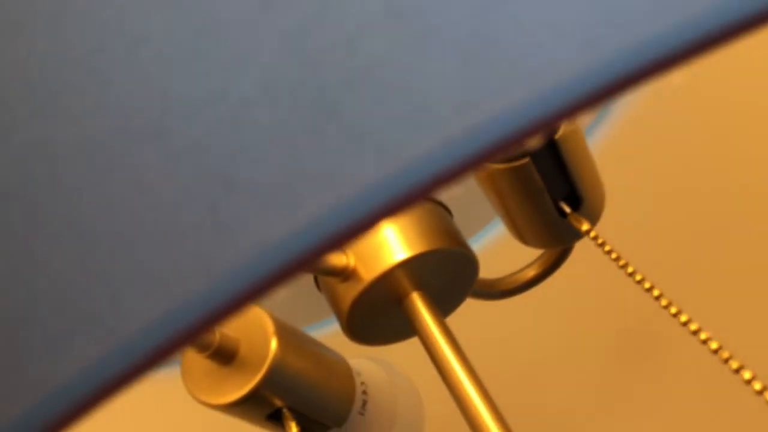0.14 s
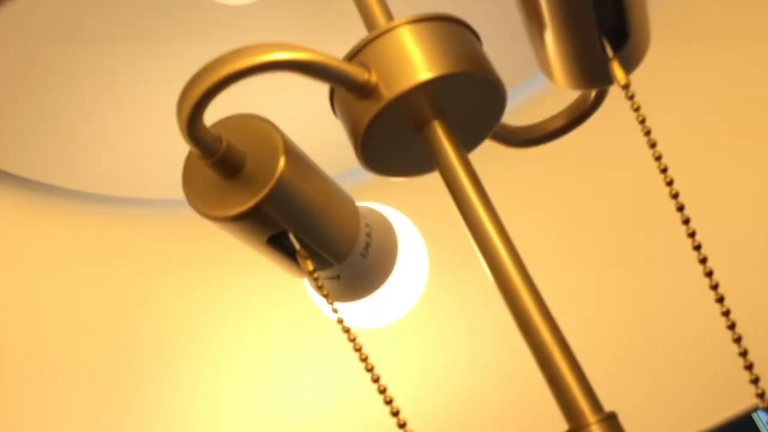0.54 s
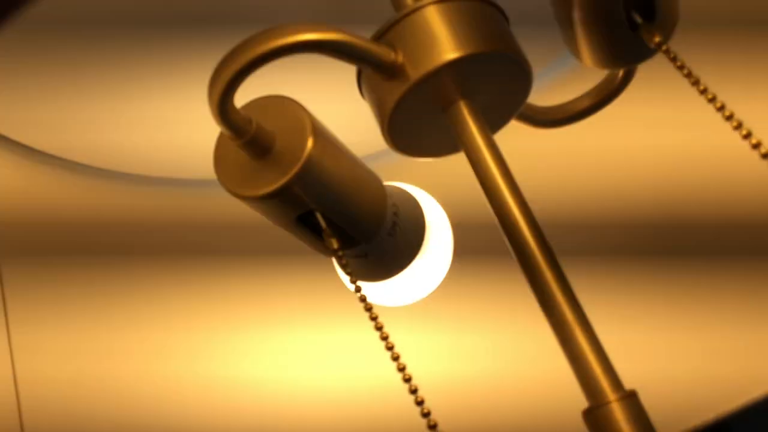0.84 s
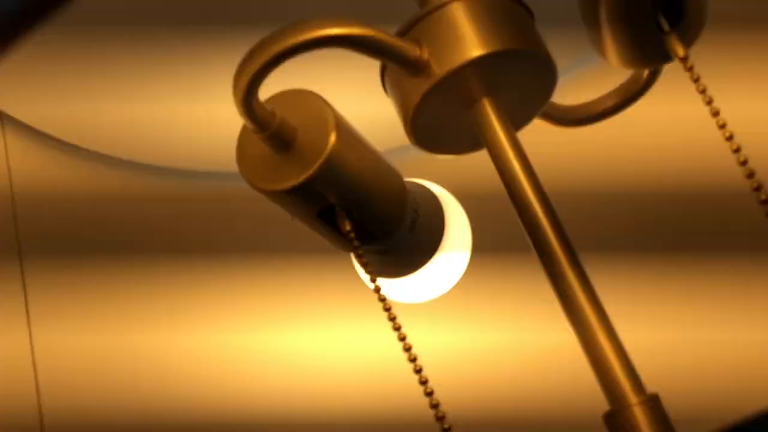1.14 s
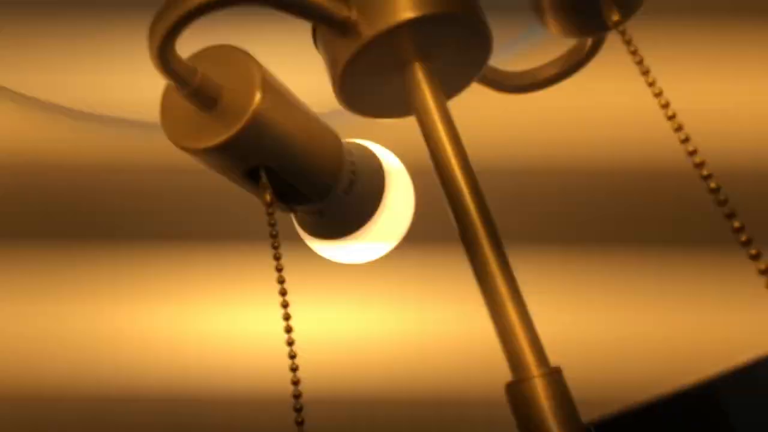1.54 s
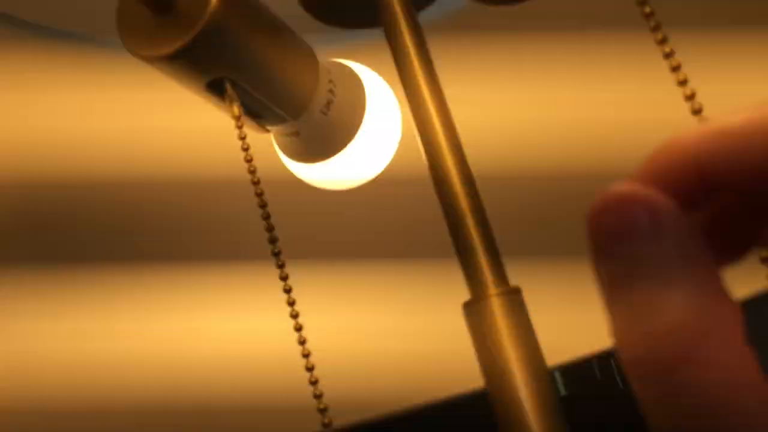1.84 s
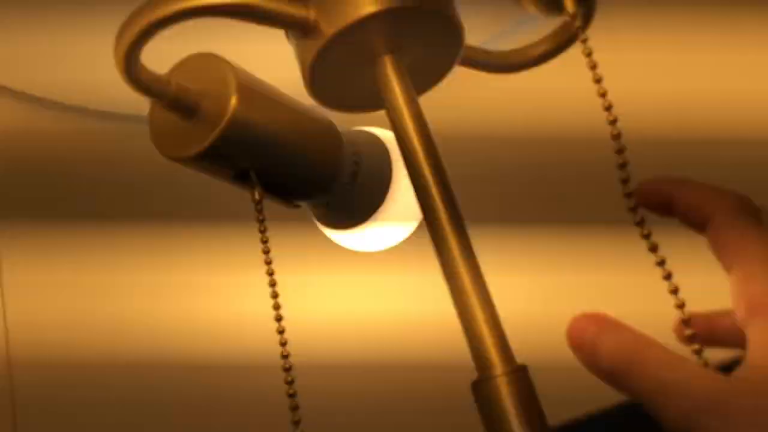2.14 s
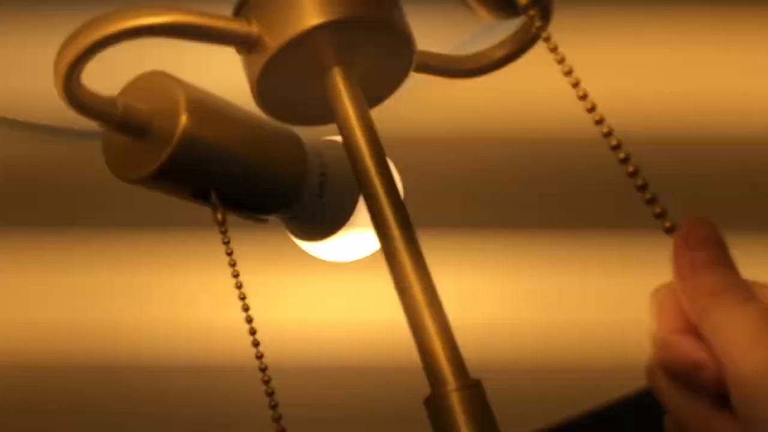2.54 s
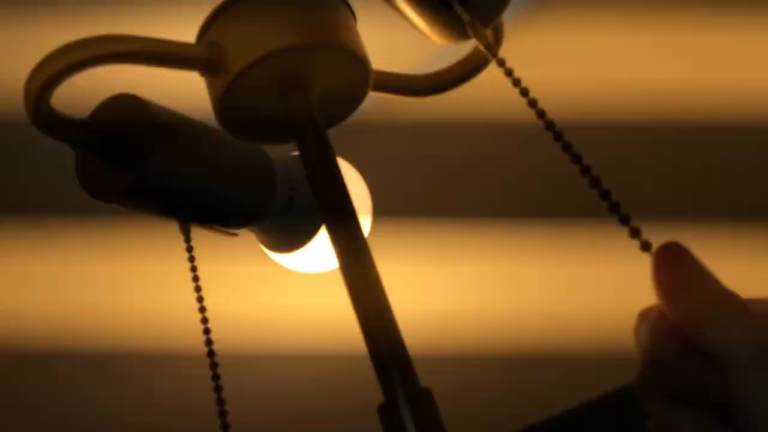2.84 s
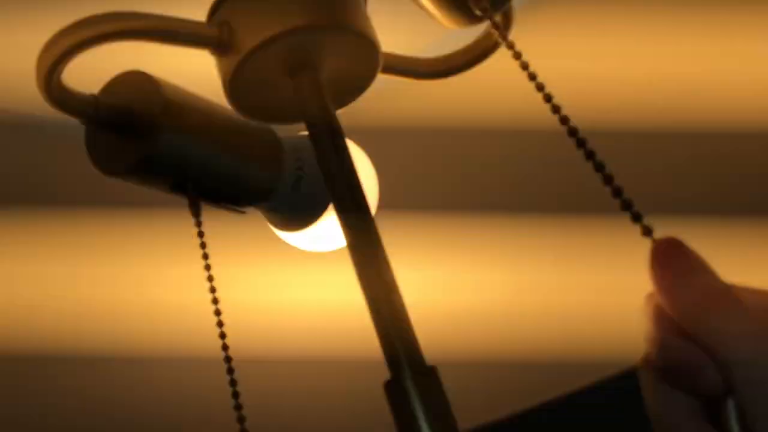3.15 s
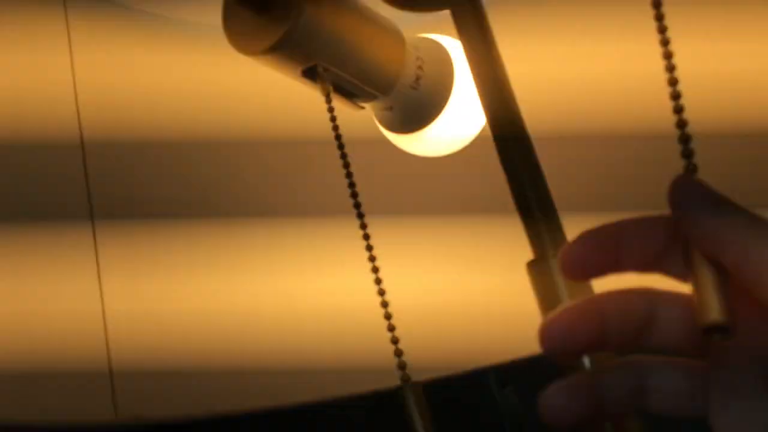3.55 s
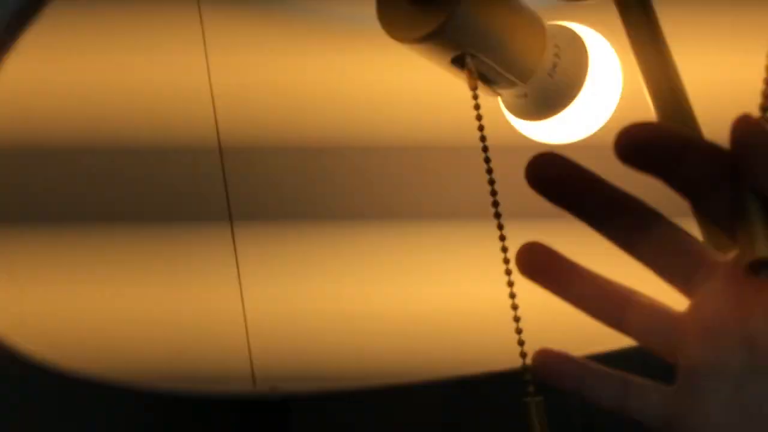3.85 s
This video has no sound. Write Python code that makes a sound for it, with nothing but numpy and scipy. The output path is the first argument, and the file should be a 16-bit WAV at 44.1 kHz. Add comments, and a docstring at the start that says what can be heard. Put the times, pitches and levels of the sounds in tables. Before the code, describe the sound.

Pull-chain lamp switches, heard close in a quiet room over steady low ventilation rumble and faint hiss. A very faint bead-chain scrape comes at 0.35-0.5 s, a dry switch snap at 1.1 s, then tiny chain ticks until 1.4 s. After a pause, faint scraping and ticks lead to a crisp click at 2.8 s and the loudest, brightest snap at 3.06 s, with brief thin brass ringing and short room reflections.

```python
"""Heard close by in a quiet room: a bead chain slides out of a brass lamp socket, a switch snaps back, the chain
ticks; then the other switch is pulled and let go, over a low ventilation rumble.
Each snap is a rattle of filtered-noise contacts plus decaying switch and shell modes; slides are sparse noise
grains, ticks are short noise with a bead tone, the room tone is coloured noise with hum.
Snaps and chain are convolved with the reflections of shade and room."""
import sys
import numpy as np
from scipy import signal
from scipy.fft import rfft, irfft
from scipy.io import wavfile
from scipy.ndimage import map_coordinates

SR = 44100
rng = np.random.default_rng(int(sys.argv[2]) if len(sys.argv) > 2 else 0)


def inscribe(sig):
    """Save sig as 16-bit PCM at rate SR to the path in sys.argv[1].

    A 1-D sig is mono; a 2-D sig holds one channel per row.
    Samples are clipped to [-1, 1] before scaling.
    """
    pcm = np.round(np.clip(np.atleast_2d(sig).T, -1, 1) * 32767)
    wavfile.write(sys.argv[1], SR, pcm.astype(np.int16))


N = 176400  # samples, 4 s

# contacts inside each snap: [t/s, level/dB, tilt/(dB per octave)]
LEFT_RELEASE_CONTACTS = [(1.1072, -29.5, 3.5), (1.1085, -24, 0.5), (1.1110, -37, -5.5), (1.1152, -40, -1),
                         (1.1163, -58, 9)]
RIGHT_PULL_CONTACTS = [(2.8031, -21.5, 6), (2.8040, -23, -1), (2.8062, -27.5, 0), (2.8102, -35, 0),
                       (2.8135, -36, -1)]
RIGHT_RELEASE_CONTACTS = [(3.0594, -13, 6), (3.0615, -17.5, -4), (3.0632, -24, -4), (3.0676, -33, -2)]


def amp(db):
    """Decibels to gain."""
    return 10 ** (np.asarray(db) / 20)


def unit(x):
    """Scale to rms 1."""
    return x / np.sqrt(np.mean(x ** 2) + 1e-20)


def along(points, hz):
    """Interpolate (f/Hz, value) points on a log frequency axis."""
    f, v = np.transpose(points)
    return np.interp(np.log(hz + 1), np.log(f + 1), v)


def coloured(x, colour):
    """Filter x by a (f/Hz, level/dB) colour, then scale to rms 1."""
    hz = np.fft.rfftfreq(len(x), 1 / SR)
    return unit(irfft(rfft(x) * amp(along(colour, hz)), len(x)))


def noise(colour, size):
    """Coloured Gaussian noise of rms 1."""
    return coloured(rng.standard_normal(size), colour)


def wobble(knots_per_s, size):
    """Smooth random curve: a spline through Gaussian knots."""
    knots = rng.standard_normal(int(size * knots_per_s / SR) + 4)
    return map_coordinates(knots, [np.arange(size) * knots_per_s / SR])


def decay(t60_s):
    """One second of exponential decay, down 60 dB after t60_s."""
    return np.exp(-np.log(1000) * np.arange(SR) / SR / t60_s)


def add(track, start_s, sound):
    """Mix a sound into the track in place, cut at the track's end."""
    part = track[round(start_s * SR):][:len(sound)]
    part += sound[:len(part)]


def ring(modes):
    """Sum of decaying (f/Hz, t60/s, level/dB) modes; low ones build up more slowly, phases wander."""
    build_cycles, phase_wander_rad = 3.6, 0.12
    t = np.arange(SR) / SR
    out = np.zeros(SR)
    for hz, t60_s, db in modes:
        phase = 2 * np.pi * (hz * t + rng.random()) + phase_wander_rad * wobble(300, SR)
        build_up = 1 - np.exp(-t * hz / build_cycles)
        out += amp(db) * decay(t60_s) * build_up * np.sin(phase)
    return out


def room_tone():
    """Ventilation rumble and faint hiss as coloured noise, plus hum wavering in level and phase."""
    # noise colours: [f/Hz, relative level/dB]
    rumble_colour = [(20, -44), (28, -34), (40, -12.5), (52, -3), (66, 0.5), (85, -1.5), (125, -8),
                     (160, -3.5), (215, -12), (255, -9), (380, -20), (500, -17), (850, -33.5),
                     (1050, -30.5), (1500, -48), (4000, -81)]
    hiss_colour = [(200, -2.5), (1500, 0.5), (3000, -1.5), (4700, -3), (5200, -1), (5700, -5), (7200, -4.5),
                   (7600, -0.5), (8000, -4), (9200, -4), (9600, 0), (10000, -6), (11400, -7.5),
                   (12000, -9.5), (15700, -12), (16000, -31.5)]
    # hum tones: [f/Hz, rms level/dB]
    hum_tones = [(66, -63), (192, -67), (250, -72)]
    rumble_db, hiss_db = -53.5, -74.5
    t = np.arange(N) / SR
    out = amp(rumble_db) * noise(rumble_colour, N) + amp(hiss_db) * noise(hiss_colour, N)
    for hz, db in hum_tones:
        swell = 1 + 0.3 * wobble(5, N)
        tone = np.sin(2 * np.pi * hz * t + 1.2 * wobble(6, N))
        out += amp(db) * unit(swell * tone)
    return out


def reflections(x):
    """Quick scatter from shade and table, then a room tail whose decay time depends on frequency."""
    # room decay: [f/Hz, t60/s]
    room_t60 = [(500, .4), (2000, 0.3), (5000, 0.51), (9000, 0.5), (14000, .2)]
    # room colour: [f/Hz, relative level/dB]
    room_colour = [(500, 8), (2000, 3), (5000, -4), (9000, -11), (14000, -7)]
    room_db, room_delay_s = -17, 0.008
    shade_db, shade_delay_s, shade_t60_s = -12, 0.004, 0.07
    hz, t, spectrum = signal.stft(noise(room_colour, SR), SR, nperseg=256)
    fade = np.exp(-np.log(1000) * t / along(room_t60, hz)[:, None])
    tail = signal.istft(spectrum * fade, SR, nperseg=256)[1]
    scatter = rng.standard_normal(SR) * decay(shade_t60_s)
    response = np.zeros(SR)
    add(response, room_delay_s, amp(room_db) * tail / np.linalg.norm(tail))
    add(response, shade_delay_s, amp(shade_db) * scatter / np.linalg.norm(scatter))
    return signal.fftconvolve(x, response)[:N]


def chain_slides():
    """Beads scrape over the slot edge: sparse random grains under short Gaussian swells."""
    # swells: [centre t/s, Gaussian sigma/s, peak level/dB]
    swells = [(0.3578, 0.0034, -57), (0.376, 0.038, -74.5), (0.412, 0.0026, -73), (0.422, 0.0072, -69.5),
              (0.484, 0.016, -71.5), (2.622, 0.022, -77), (2.786, 0.024, -63)]
    # scrape colour: [f/Hz, relative level/dB]
    slide_colour = [(800, -15), (2000, -5), (3500, 0.5), (4200, -8), (4950, 4.5), (5900, -9), (6800, -5),
                    (10500, -13), (13000, -23)]
    grains_per_s = 1200
    t = np.arange(N) / SR
    grains = rng.standard_normal(N) * (rng.random(N) < grains_per_s / SR)
    envelope = sum(amp(db) * np.exp(-0.5 * ((t - s) / sigma_s) ** 2) for s, sigma_s, db in swells)
    return coloured(grains, slide_colour) * envelope


def chain_ticks():
    """Single beads tap: a noise burst with one small decaying tone."""
    # ticks: [t/s, level/dB, ring f/Hz, ring level re tick/dB]
    ticks = [(1.2428, -58, 12500, -17), (1.3128, -58, 10800, 4), (1.4150, -56, 5470, -9),
             (2.7684, -64, 13400, -2), (2.7738, -52.5, 4000, -2)]
    # tap colour: [f/Hz, relative level/dB]
    tick_colour = [(1000, -25), (4000, -9.5), (7000, -3), (13000, 0), (16000, -4)]
    tick_t60_s, bead_t60_s = 0.019, 0.036
    out = np.zeros(N)
    for s, db, hz, ring_db in ticks:
        tap = decay(tick_t60_s) * noise(tick_colour, SR)
        bead = ring([(hz, bead_t60_s, ring_db)])
        add(out, s, amp(db) * (tap + bead))
    return out


def shells():
    """Brass shells ring on after each snap with a few thin tones."""
    # left shell modes: [f/Hz, t60/s, level before shell_db/dB]
    left_shell = [(1670, 1.0, -71), (3386, .4, -68), (5592, .8, -65), (6563, .25, -54), (7515, .4, -63)]
    # right shell modes: [f/Hz, t60/s, pull level before shell_db/dB, release level before shell_db/dB]
    right_shell = [(1513, .9, -71, -57), (1680, .25, -61, -60), (3526, .12, -47, -39),
                   (4985, .65, -62, -58), (6293, .32, -47, -37), (7538, .27, -66, -52),
                   (8146, .38, -60, -55)]
    shell_db = -1.5
    pulled = [(hz, t60_s, db) for hz, t60_s, db, _ in right_shell]
    released = [(hz, t60_s, db) for hz, t60_s, _, db in right_shell]
    out = np.zeros(N)
    add(out, LEFT_RELEASE_CONTACTS[0][0], ring(left_shell))
    add(out, RIGHT_PULL_CONTACTS[0][0], ring(pulled))
    add(out, RIGHT_RELEASE_CONTACTS[0][0], ring(released))
    return amp(shell_db) * out


def switch_modes(levels):
    """Give each (f/Hz, level/dB) switch mode its t60; higher modes die sooner."""
    ref_t60_s, ref_hz, damping_exponent = 0.037, 5020, 0.55
    return [(hz, ref_t60_s * (ref_hz / hz) ** damping_exponent, db) for hz, db in levels]


def snap(contacts, colour, modes):
    """The sprung rotor hits its stop, rattles for a few milliseconds and rings the socket."""
    contact_t60_s, contact_rise_s = 0.013, 0.00043
    tilt_from_hz = 1800  # contacts differ in colour only above this
    rise = 1 - np.exp(-np.arange(SR) / SR / contact_rise_s)
    envelope = decay(contact_t60_s) * rise
    out = np.zeros(N)
    for s, db, tilt in contacts:
        tilted = [(hz, level + tilt * np.log2(max(hz / tilt_from_hz, 1))) for hz, level in colour]
        add(out, s, amp(db) * envelope * noise(tilted, SR))
    add(out, contacts[0][0], ring(modes))
    return out


def switches():
    """Three snaps: the left switch springs back; the right one is pulled, then let go."""
    # contact colours: [f/Hz, relative level/dB]
    left_colour = [(100, -35), (800, -14.5), (1300, -9.5), (1800, -5.5), (3500, -3.5), (5000, 5),
                   (6200, -3.5), (11000, -2), (13000, -14), (16000, -19)]
    pull_colour = [(100, -44), (900, -17), (1600, 0), (2600, -4.5), (3500, 2), (4200, -4), (5400, 2.5),
                   (7500, -5), (10000, -0.5), (13000, 2), (16000, -16)]
    release_colour = [(100, -38), (450, -13), (850, -24.5), (1200, -8), (2400, -14.5), (4000, 0),
                      (6500, 2.5), (7700, -3), (9300, 2.5), (11000, -13.5), (13000, -10), (16000, -23)]
    # damped left switch modes: [f/Hz, level/dB]
    left_switch = [(1300, -56), (2370, -53), (3560, -52), (4750, -32), (4910, -37), (5130, -30),
                   (5470, -40), (7070, -44), (8690, -41), (8950, -39), (10450, -38)]
    # damped right switch modes: [f/Hz, pull level/dB, release level/dB]
    right_switch = [(1498, -48, -35.5), (1900, -47, -54), (3128, -48.5, -33), (4080, -54.5, -36.5),
                    (4735, -34, -25.5), (5290, -28.5, -31), (5430, -31, -25), (6010, -47, -26.5),
                    (6570, -42.5, -23.5), (6970, -48.5, -30.5), (8350, -47, -27.5), (9270, -30.5, -21),
                    (9950, -38.5, -31), (11450, -30.5, -39), (12600, -30, -31.5)]
    pulled = [(hz, db) for hz, db, _ in right_switch]
    released = [(hz, db) for hz, _, db in right_switch]
    return [snap(LEFT_RELEASE_CONTACTS, left_colour, switch_modes(left_switch)),
            snap(RIGHT_PULL_CONTACTS, pull_colour, switch_modes(pulled)),
            snap(RIGHT_RELEASE_CONTACTS, release_colour, switch_modes(released))]


def scene():
    """Snaps and chain, each with its own reflections, plus ringing shells and room tone."""
    sounds = switches() + [chain_ticks() + chain_slides()]
    reflected = sum(x + reflections(x) for x in sounds)
    return (reflected + shells() + room_tone())[None]


def record(dry):
    """Low-pass with a linear 500 Hz wide slope centred on top_hz."""
    top_hz = 16200
    hz = np.fft.rfftfreq(N, 1 / SR)
    return irfft(rfft(dry) * np.clip((top_hz - hz) / 500 + 0.5, 0, 1), N)


dry = scene()
out = record(dry)
inscribe(out)
```